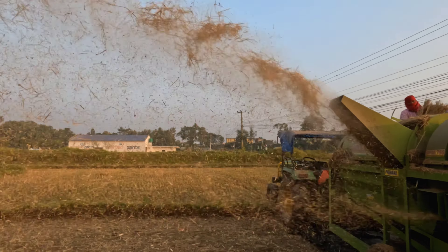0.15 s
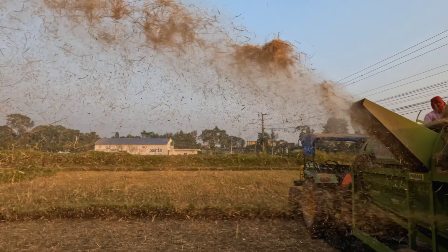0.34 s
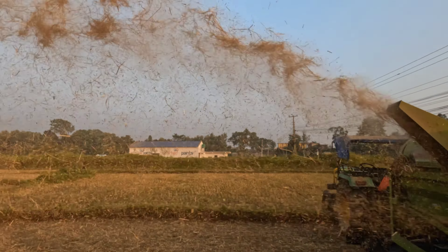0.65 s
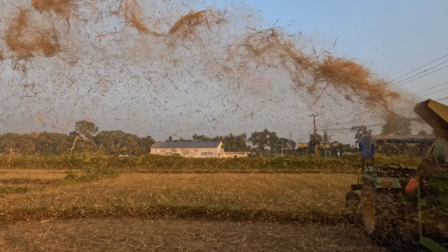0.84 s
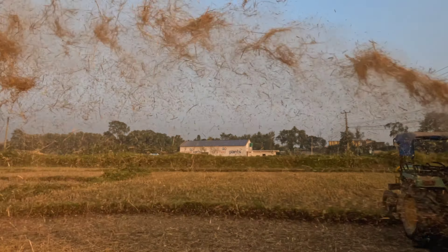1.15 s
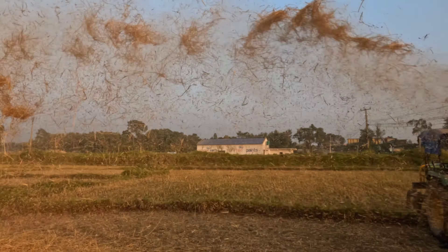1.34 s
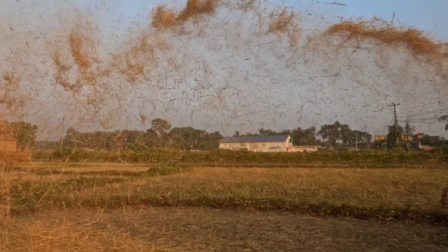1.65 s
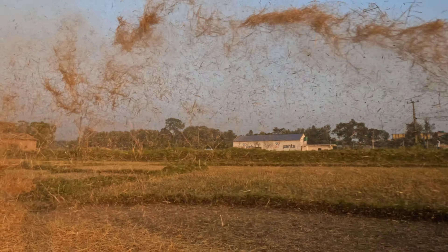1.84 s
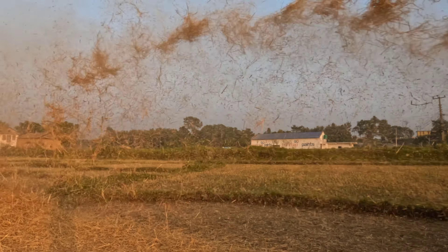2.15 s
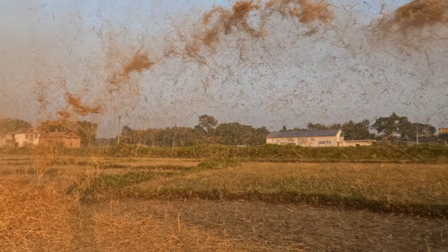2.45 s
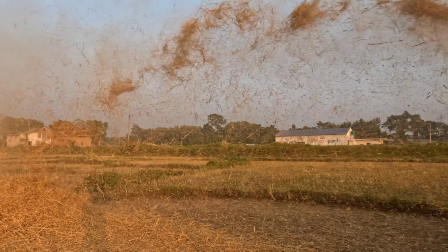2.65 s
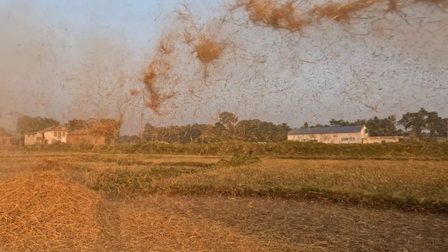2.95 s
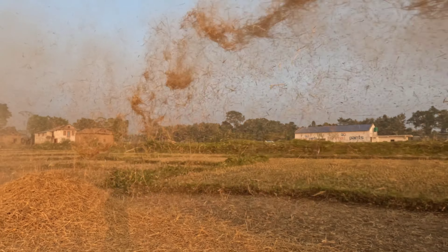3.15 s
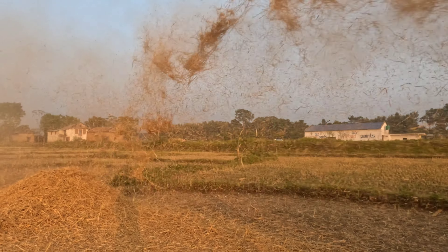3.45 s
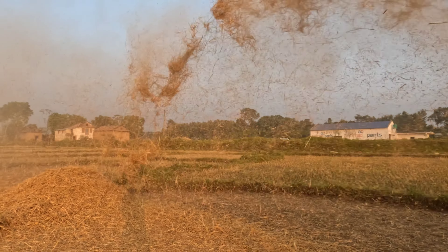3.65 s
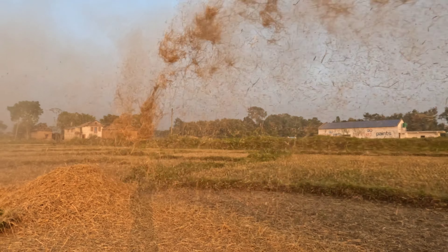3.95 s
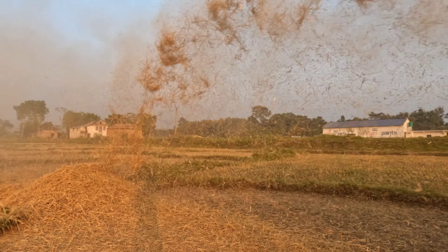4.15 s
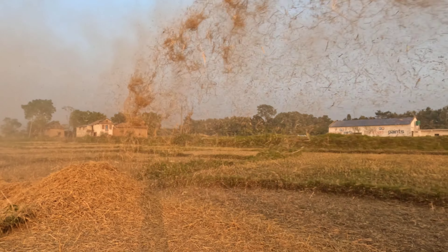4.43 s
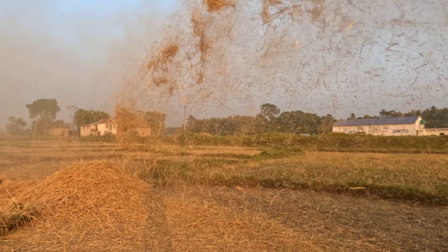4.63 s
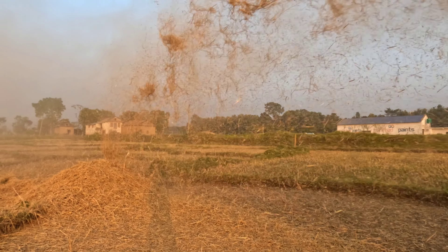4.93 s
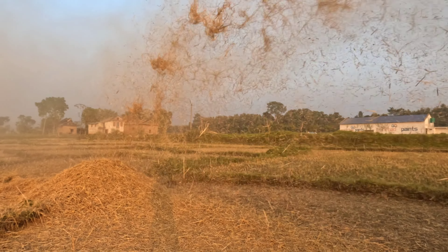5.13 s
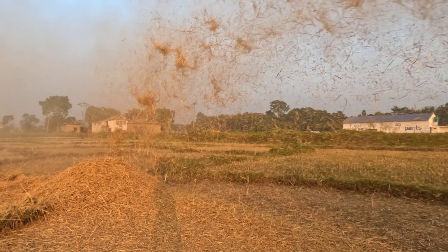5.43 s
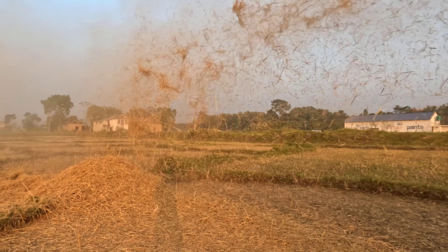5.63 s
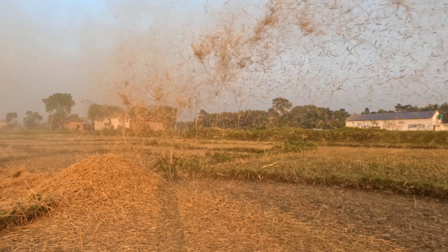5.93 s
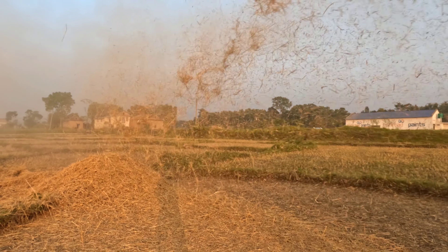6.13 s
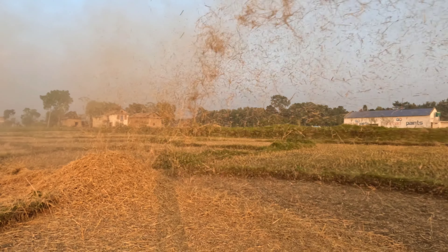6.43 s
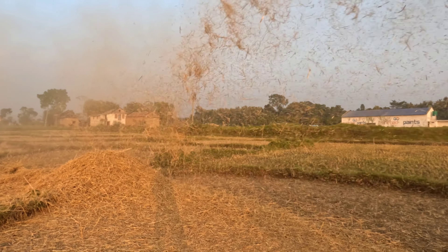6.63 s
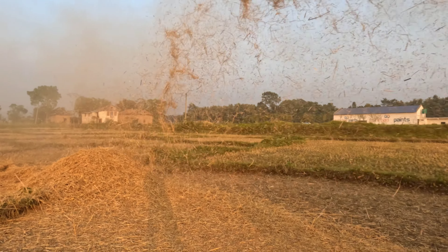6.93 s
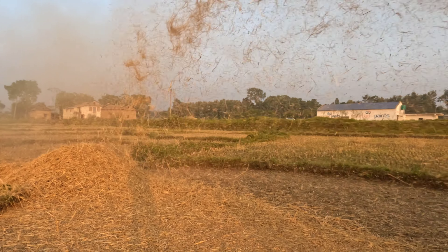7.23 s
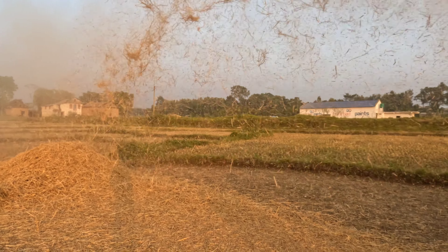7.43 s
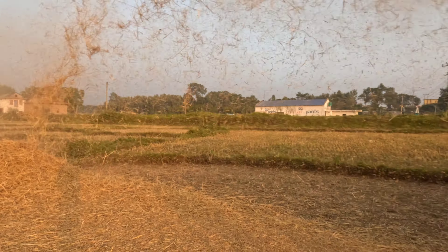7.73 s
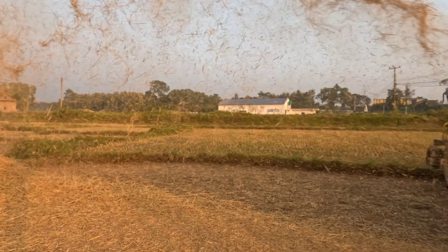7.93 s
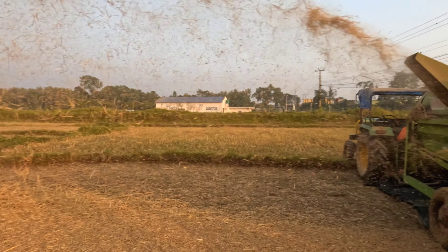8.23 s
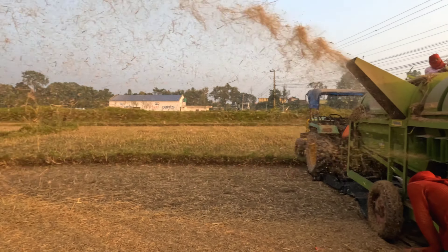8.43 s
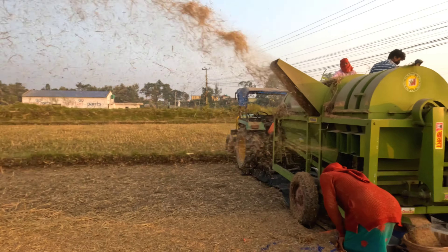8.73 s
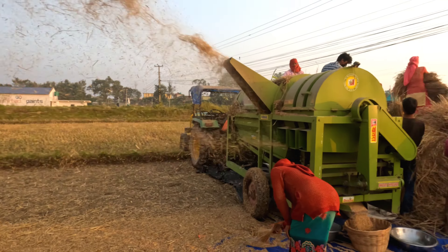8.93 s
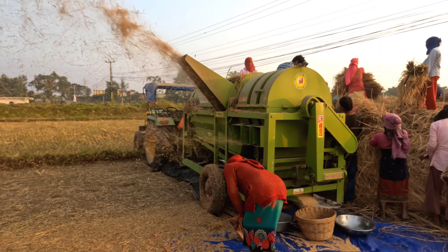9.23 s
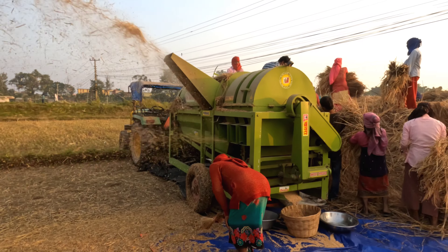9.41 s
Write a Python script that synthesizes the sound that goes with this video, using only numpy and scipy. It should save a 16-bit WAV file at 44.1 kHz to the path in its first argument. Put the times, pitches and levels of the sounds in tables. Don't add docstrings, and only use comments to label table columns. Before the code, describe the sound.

A tractor-powered crop thresher runs without pause in an open field, a few metres from a handheld stereo microphone. A strong low engine drone dominates, with a rough drum roar and dry straw hiss over it. Soft thumps and brief scrapes recur irregularly. The hiss dulls slightly as the camera turns away, a small belt squeak comes near four seconds, then the hiss brightens as the view swings back.

```python
import sys
import numpy as np
from scipy import signal
from scipy.fft import rfft, irfft, next_fast_len
from scipy.io import wavfile
from scipy.ndimage import uniform_filter1d, map_coordinates

SR = 44100
rng = np.random.default_rng(int(sys.argv[2]) if len(sys.argv) > 2 else 0)


def rack_gain(trim_db):
    fader = np.asarray(trim_db, float)
    return 10 ** (fader / 20)


def master_out(mix):
    frames = np.transpose(np.atleast_2d(mix))
    ceiling = np.clip(frames, -1, 1)
    pcm = np.round(ceiling * 32767).astype(np.int16)
    wavfile.write(sys.argv[1], SR, pcm)


N = 422037

# time in seconds, second exhaust order in Hz.
ENGINE_SPEED = [(0, 78.0), (.5, 78.02), (.98, 77.7), (1.25, 77.27), (1.9, 76.95), (2.3, 77.55),
                (3.2, 78.45), (4.25, 79.42), (4.95, 79.4), (5.3, 78.9), (5.75, 78.52), (6.7, 78.8),
                (7.05, 79.2), (8.1, 79.95), (8.5, 79.15), (8.98, 78.2), (9.57, 78.13)]
# multiple of firing rate, level in dB.
EXHAUST_ORDERS = [(1, -7.5), (1.25, -41), (1.5, -31), (1.75, -25), (2, -0.5), (3, -13.5), (4, -32),
                  (5, -22.5), (6, -38.5), (7, -20), (8, -32.5), (9, -23), (10, -31), (11, -31)]
# multiple of blade rate, level in dB.
BLOWER_ORDERS = [(1, -38), (2, -25), (3, -22), (4, -21), (5, -31), (6, -31), (8, -26)]
# time in seconds, feed in dB over the usual.
CROP_FEED = [(0, 1), (.6, 0.56), (1.8, 0.33), (3.2, -0.27), (4.3, 0.037), (5.2, 0.9), (6.2, 0.11),
             (7.6, -0.14), (8.1, -.8), (8.4, -0.072), (8.6, -0.49), (9.4, 0.43), (9.57, -0.56)]
# time in seconds, pose (0 turned away, 1 side-on, 2 facing the machine).
CAMERA_POSE = [(0, 1.1), (.6, 0.86), (1.2, 0.56), (1.8, 0.25), (2.5, 0.03), (5, .03), (7.5, 0.082),
               (7.9, 0.48), (8.2, 0.9), (8.5, 1.04), (8.62, 1.6), (8.9, 1.72), (9.2, 2.5), (9.57, 2.14)]
# frequency in Hz, density in dB per Hz.
DRUM_AWAY = [(120, -21), (180, 0.5), (250, -2.5), (380, -0.5), (540, 0), (630, -5), (760, -6), (980, -6),
             (1080, -7.5), (1230, -6), (1420, -11.5), (1900, -14.5), (2500, -25.5), (4000, -50)]
# frequency in Hz, density in dB per Hz.
DRUM_SIDE = [(120, -18), (180, -2.5), (270, -2), (380, -5), (450, -8), (540, -4.5), (650, -7.5), (770, -11),
             (920, -7.5), (1150, -8.5), (1300, -12.5), (1700, -15), (2300, -27.5), (4000, -35)]
# frequency in Hz, density in dB per Hz.
DRUM_FRONT = [(120, -12.5), (190, 2.5), (300, -4.5), (450, -6), (570, -1), (700, -7), (820, -7.5),
              (920, -6), (1120, -9.5), (1260, -7.5), (1480, -13.5), (2000, -16), (2600, -30), (4000, -37)]
# time in seconds, size against the roar.
SHEAF_THUMPS = [(.046, 1.1), (.133, .98), (.236, 0.9), (.669, 1.1), (1.281, 1.2), (1.919, 1.1),
                (2.008, 1.1), (2.535, 1.1), (2.903, .88), (3.47, .68), (3.847, 0.64), (3.958, 1.3),
                (5.179, .96), (6.011, 1.1), (6.17, 0.66), (6.21, 1.6), (6.26, 0.85), (6.833, 1.1),
                (6.902, .74), (8.035, 1.2), (8.333, 0.81), (8.691, 1.2), (9.081, 1.2), (9.475, 0.68)]
# frequency in Hz, density in dB per Hz.
HOUSING_RING = [(600, -24), (1000, 4), (1300, 1.5), (1600, -6.5), (2200, -9.5), (3000, -31)]
# frequency in Hz, density in dB per Hz.
STRAW_HISS = [
    [(1100, -15), (2000, -3), (2700, -3), (3500, -5), (4500, -6), (5800, -3.5), (7600, -5), (8100, -6.5), (9200, -9.5), (10000, -13), (11000, -11), (12300, -3.5), (13500, -16), (15500, -41)],
    [(1100, -22), (2000, -5), (2700, -2.5), (3500, -3.5), (4500, -5), (5800, -4), (7600, -4.5), (8100, -6.5), (9200, -8.5), (10000, -14), (11000, -9), (12300, -3), (13500, -15), (15500, -32)],
    [(1100, -32), (2000, -4), (2700, -3.5), (3500, -5), (4500, -6), (5800, -6.5), (7600, -6.5), (8100, -9), (9200, -9), (10000, -10), (11000, -10), (12300, -8), (13500, -13), (15500, -31)],
]
# time in seconds, size against the hiss, width in seconds.
STRAW_CLUMPS = [(.005, .8, .015), (.074, 0.46, .03), (.64, 0.72, .04), (.85, .7, .03), (2.507, 0.57, .03),
                (3.44, .4, .06), (3.712, 1, .03), (3.84, .5, .04), (4.17, .9, 0.033), (4.33, .6, .03),
                (4.512, 1.4, .02), (4.618, 1.1, .02), (4.78, 0.56, .03), (4.87, 1.1, .02),
                (5.215, 0.76, .025), (5.356, .8, .02), (5.695, 0.69, 0.016), (6.694, 1.2, .009),
                (6.721, 1.1, .003), (6.762, 1.1, .003), (8.38, .6, 0.074), (9.436, 0.83, .02),
                (9.563, 0.65, .015)]
# frequency in Hz, density in dB per Hz.
CHUTE_RING = [(1500, -40), (2500, 0.5), (4000, -3.5), (7500, -3), (9000, -7), (11000, -37)]
# time in seconds, peak in dB, width in seconds.
BELT_SLIPS = [
    (3.845, -31.5, .075),
    (3.965, -36, .03),
]
# frequency in Hz, density in dB per Hz.
SHAKE = [(15, -10), (25, -5), (35, -15), (50, 4), (65, 3), (100, 3.5), (135, 0), (220, -30)]
# frequency in Hz, left-right likeness, left lead in rad, L-R in dB.
IMAGE_AWAY = [(60.0, 1.0, -0.01, 0.1), (200.0, 0.998, -0.02, -0.1), (450.0, 0.984, -0.18, -0.1),
              (800.0, 0.934, -0.5, -2.4), (1300.0, 0.941, -0.49, -1.3), (2000.0, 0.842, -0.91, -1.9),
              (2800.0, 0.63, -1.5, -3.3), (3600.0, 0.5, -0.97, -6.2), (4600.0, 0.612, -0.15, -4.5),
              (6000.0, 0.9, -0.01, -1.3), (7700, 0.9, -0.04, 0.1), (8800.0, 0.97, -0.02, -0.1),
              (10000, 0.356, 0.02, 2.1), (12300.0, 0.335, 0.33, 4.8)]
# frequency in Hz, left-right likeness, left lead in rad, L-R in dB.
IMAGE_SIDE = [(60.0, 1.0, -0.01, 0.2), (200.0, 0.996, -0.04, -0.2), (450.0, 0.952, -0.38, -1.7),
              (800.0, 0.924, -0.24, -3.9), (1300.0, 0.892, -0.57, -2.9), (2000.0, 0.693, -0.83, -3.5),
              (2800.0, 0.659, -0.95, -4.1), (3600.0, 0.673, -0.87, -5.1), (4600.0, 0.63, -0.48, -4.1),
              (6000.0, 0.769, -0.19, -2.9), (7700, 0.826, 0.02, -1.2), (8800.0, 0.88, 0.0, -0.8),
              (10000, 0.252, 0.18, 1.0), (12300.0, 0.372, 0.4, 5.0)]
# frequency in Hz, left-right likeness, left lead in rad, L-R in dB.
IMAGE_FRONT = [(60.0, 1.0, -0.0, 0.1), (200.0, 0.997, -0.04, -0.0), (450.0, 0.923, 0.05, -2.1),
               (800.0, 0.953, -0.3, -0.5), (1300.0, 0.903, -0.26, 0.8), (2000.0, 0.911, -0.27, -0.2),
               (2800.0, 0.825, -0.38, -0.3), (3600.0, 0.829, -0.43, 0.4), (4600.0, 0.802, -0.47, 1.3),
               (6000.0, 0.81, -0.58, 0.7), (7700, 0.795, -0.49, 0.6), (8800.0, 0.985, -0.02, 0.0),
               (10000, 0.619, -0.12, 3.4), (12300.0, 0.226, -0.11, 2.9)]
IMAGE_BY_POSE = IMAGE_AWAY, IMAGE_SIDE, IMAGE_FRONT
# frequency in Hz, likeness, lead in rad, L-R in dB.
PORTS_GROUND = [(60, 0.99, 0, -0.5)]
# frequency in Hz, gain in dB.
MIC_RESPONSE = [(20, -0.18), (7000, 0.66), (7300, 2.5), (7800, 0.6), (12500, -13), (13800, -17),
                (15050, -17), (15200, -30)]

BLADES_PER_FIRING = 12 / 13
EXHAUST_DB, LOADED_HZ, FALL_DB_PER_HZ = -16, 78, -0.1
ROAR_BY_POSE_DB, ROAR_FEED_SHARE = (-26.5, -25, -26), 0.76
HISS_BY_POSE_DB, HISS_FEED_SHARE = (-36, -31.5, -31.5), 1.24
THUMP_S = .031
SLIP_S, SLIP_HZ, GRIP_HZ, CATCH_S = 3.77, 890, 995, .045


def unit(x):
    return x / np.sqrt(np.mean(x ** 2) + 1e-20)


def along(points, hz):
    f_hz, *columns = np.transpose(points)
    return [np.interp(np.log(hz + 1), np.log(f_hz + 1), column) for column in columns]


def curves(rows):
    time_s, *columns = np.transpose(rows)
    return [np.interp(np.arange(N) / SR, time_s, column) for column in columns]


def wobble(rate_hz):
    knots = rng.standard_normal(int(N * rate_hz / SR) + 4)
    return map_coordinates(knots, [np.arange(N) * rate_hz / SR])


def bumps(rows):
    t = np.arange(N) / SR
    return sum(height * np.exp(-2 * ((t - at_s) / width_s) ** 2) for at_s, height, width_s in rows)


def facing():
    return np.clip(curves(CAMERA_POSE)[0], 0, 2)


def loudness(by_pose_db, feed_share):
    return np.interp(facing(), range(3), by_pose_db) + feed_share * curves(CROP_FEED)[0]


def rush(spectrum, ports, patchy_db):
    z = signal.stft(rng.standard_normal((2, N + 8192)), nperseg=512)[2]
    patches = rng.standard_normal(z.shape[1:])
    patches = uniform_filter1d(patches, size=8, axis=0)
    patches = unit(uniform_filter1d(patches, size=5, axis=1))
    pair = signal.istft(z * rack_gain(patchy_db * patches), nperseg=512)[1]
    m = next_fast_len(pair.shape[1])
    hz = np.fft.rfftfreq(m, 1 / SR)
    alike, lead_rad, balance_db = along(ports, hz)
    turn = np.arccos(np.clip(alike, 0, 1)) / 2
    shared, own = rfft(pair, m) * rack_gain(along(spectrum, hz)[0]) * [np.cos(turn), np.sin(turn)]
    tilt = rack_gain(balance_db / 2) * np.exp(.5j * lead_rad)
    left, right = (shared + own) * tilt, (shared - own) / tilt
    return unit(irfft([left, right], m)[:, :N])


def turning(spectra, patchy_db):
    pose = facing()
    mix = 0
    for k, spectrum in enumerate(spectra):
        share = np.sqrt(np.clip(1 - abs(pose - k), 0, 1))
        mix = mix + share * rush(spectrum, IMAGE_BY_POSE[k], patchy_db)
    return mix


def orders(turns, table, sway_db, slip_rad):
    uneven_db = 1.05 * wobble(6)
    hidden = np.clip(facing() - 1, 0, 1)
    pulse = 0
    for k, db in table:
        upper = max(k - 5, 0)
        lag_rad = .98 * upper - .58 / k ** 3
        level_db = db + sway_db * k * wobble(7.2) - uneven_db * np.cos(np.pi * k) - 2.0 * upper * hidden
        phase = k * (2 * np.pi * turns + slip_rad * wobble(5)) - lag_rad
        pulse = pulse + rack_gain(level_db) * np.cos(phase)
    return pulse


def engine_and_blower():
    hz, = curves(ENGINE_SPEED)
    firings = np.cumsum(hz) / 2 / SR + .63
    exhaust = orders(firings, EXHAUST_ORDERS, sway_db=.25, slip_rad=.035)
    blower = orders(BLADES_PER_FIRING * firings, BLOWER_ORDERS, sway_db=0.4, slip_rad=0.067)
    level_db = EXHAUST_DB - FALL_DB_PER_HZ * (hz - LOADED_HZ)
    return np.sqrt(2) * rack_gain(level_db) * (exhaust + blower), firings


def drum(firings):
    throb = 1 + .06 * np.cos(2 * np.pi * firings / 8) + .025 * np.cos(2 * np.pi * firings)
    flutter = rack_gain(.45 * wobble(28))
    roar = throb * flutter * turning((DRUM_AWAY, DRUM_SIDE, DRUM_FRONT), patchy_db=.8)
    hits = bumps([(at_s, size, THUMP_S) for at_s, size in SHEAF_THUMPS])
    rattle = 0.49 * hits * rush(HOUSING_RING, IMAGE_AWAY, patchy_db=2.0)
    return rack_gain(loudness(ROAR_BY_POSE_DB, ROAR_FEED_SHARE)) * (roar + rattle)


def straw(firings):
    push = 1 + .018 * np.cos(2 * np.pi * BLADES_PER_FIRING * firings)
    hiss = push * turning(STRAW_HISS, patchy_db=0.73)
    scrapes = bumps(STRAW_CLUMPS) * rush(CHUTE_RING, IMAGE_AWAY, patchy_db=-1.5)
    level_db = loudness(HISS_BY_POSE_DB, HISS_FEED_SHARE) + 0.18 * wobble(25) + .5 * wobble(50)
    return rack_gain(level_db) * (hiss + scrapes)


def belt():
    since_s = np.clip(np.arange(N) / SR - SLIP_S, 0, None)
    hz = GRIP_HZ - (GRIP_HZ - SLIP_HZ) * np.exp(-(since_s / CATCH_S) ** 2 / 2)
    envelope = bumps([(at_s, rack_gain(db), width_s) for at_s, db, width_s in BELT_SLIPS])
    return np.sqrt(2) * envelope * np.sin(2 * np.pi * np.cumsum(hz) / SR)


def ground_shake():
    return rack_gain(-32.0) * rush(SHAKE, PORTS_GROUND, patchy_db=2.7)


def scene():
    tones, firings = engine_and_blower()
    balance = rack_gain([[.1], [-.1]])
    return tones * balance + drum(firings) + straw(firings) + belt() + ground_shake()


def roll_off(x):
    return signal.sosfilt(signal.butter(12, 15620, fs=SR, output="sos"), x)


def record(dry):
    soft = 1.01 * dry / (1 + abs(dry / .72) ** 5) ** (1 / 5)
    m = next_fast_len(N)
    response_db, = along(MIC_RESPONSE, np.fft.rfftfreq(m, 1 / SR))
    heard = irfft(rfft(soft, m) * rack_gain(response_db), m)[:, :N]
    return roll_off(heard - .0039)


dry = scene()
out = record(dry)
master_out(out)
```